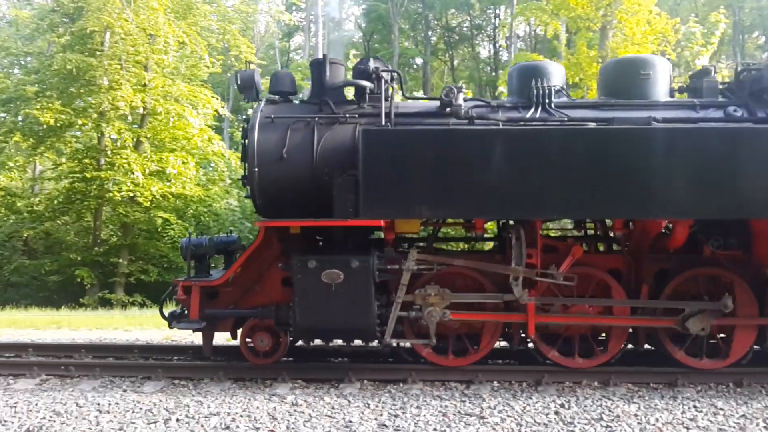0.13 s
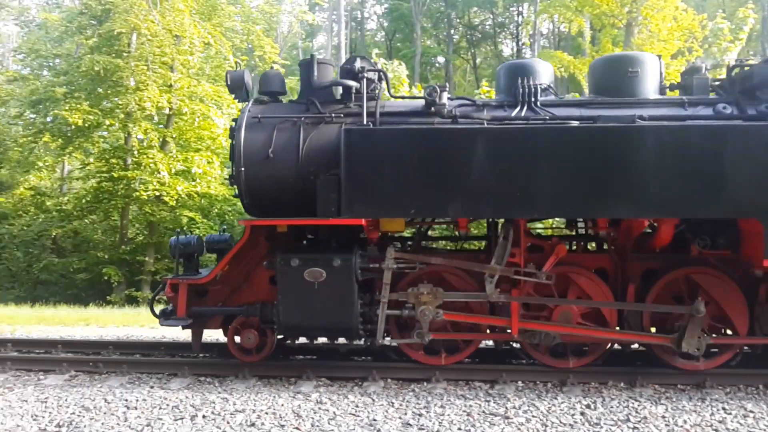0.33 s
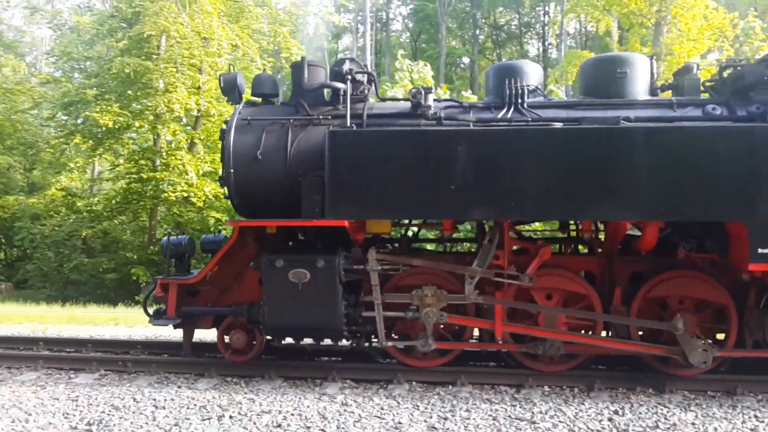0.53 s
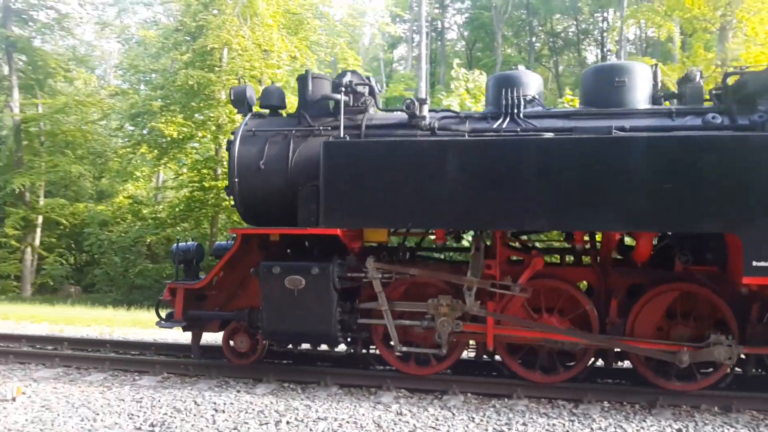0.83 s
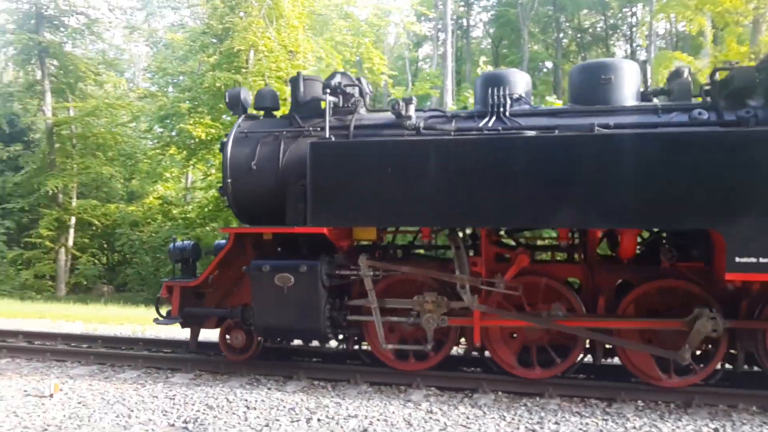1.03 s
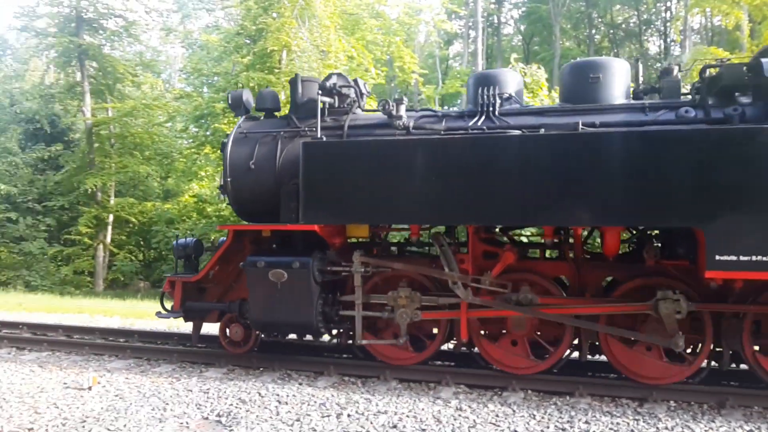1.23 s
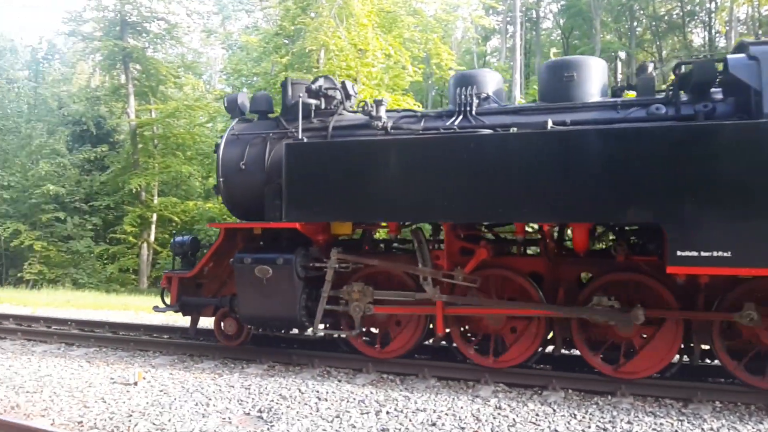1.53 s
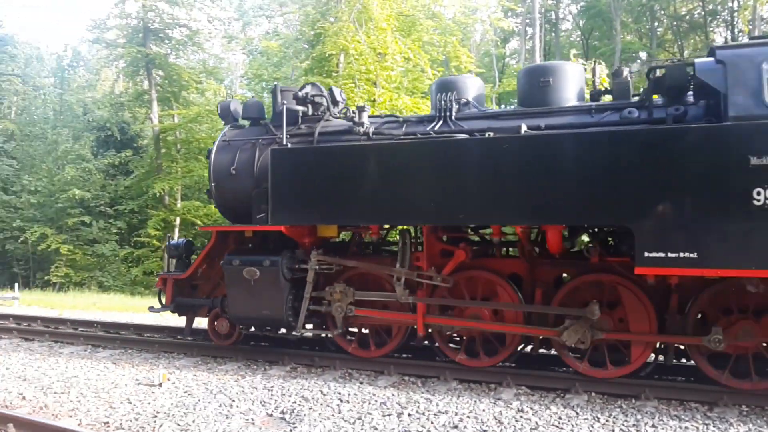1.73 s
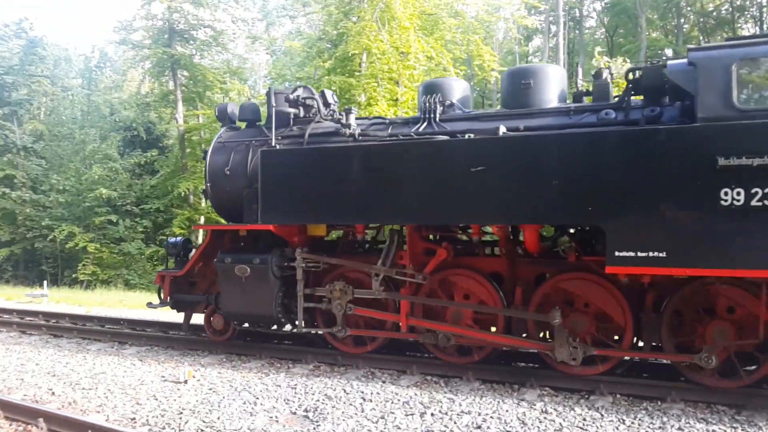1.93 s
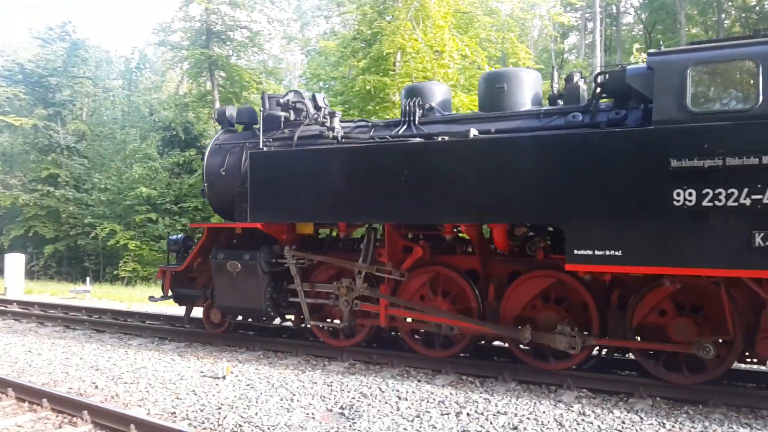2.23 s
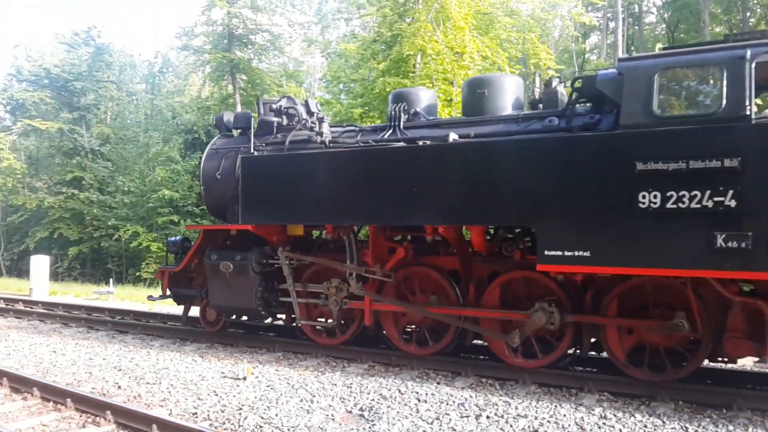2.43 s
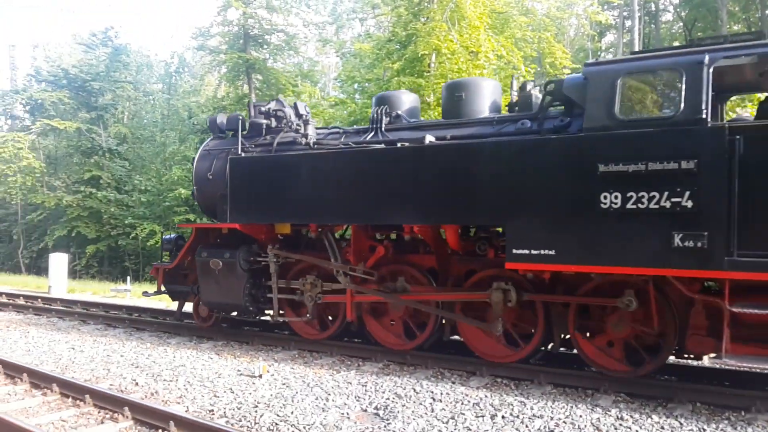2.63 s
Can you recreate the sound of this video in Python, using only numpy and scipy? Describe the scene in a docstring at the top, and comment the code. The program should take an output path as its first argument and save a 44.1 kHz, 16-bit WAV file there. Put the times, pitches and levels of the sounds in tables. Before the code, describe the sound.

A steam locomotive rolls slowly among trees, giving seven evenly spaced, hollow booming chuffs with hissing tails. Rods knock between beats, steam leaks steadily, wheels rumble low; the right microphone sounds muffled and slightly late.

```python
"""Exhaust beats of a steam locomotive rolling slowly among trees: each sends a jet of steam up the chimney,
which roars, barks and hisses as filtered noise, while the lowest pipe resonance booms as a wavering tone.
Rods knock now and then as struck steel modes, leaks hiss and whistle as coloured and narrow-band noise,
a short spit of steam escapes, and the wheels rumble as low noise.
Of the two microphone ports the right one is muffled and slightly late."""
import sys
import numpy as np
from scipy import signal
from scipy.fft import rfft, irfft, next_fast_len
from scipy.io import wavfile

SR = 44100
rng = np.random.default_rng(int(sys.argv[2]) if len(sys.argv) > 2 else 0)


def voltage_ratio(decibels):
    """Convert decibels (scalar or array-like) to amplitude ratios, 20 dB per decade."""
    exponent = np.asarray(decibels, float) / 20
    return 10 ** exponent


def int16_out(signal):
    """Quantize to a 16-bit WAV file."""
    q = np.round(np.clip(np.atleast_2d(signal).T, -1, 1) * 32767)
    wavfile.write(sys.argv[1], SR, q.astype(np.int16))


N = 123479   # samples
FFT = next_fast_len(N)


def rms_one(x):
    """Scale to unit rms."""
    return x / np.sqrt(np.mean(x ** 2) + 1e-20)


def at_hz(points):
    """Read a table of (Hz, value) at every FFT bin, on a log frequency axis."""
    hz, value = np.transpose(points)
    bins_hz = np.fft.rfftfreq(FFT, 1 / SR)
    return np.interp(np.log(bins_hz + 1), np.log(hz), value)


def level(rows):
    """Gain over time from rows of (s, dB)."""
    return voltage_ratio(np.interp(np.arange(N) / SR, *np.transpose(rows)))


def drift(rate_hz, count):
    """Slow random curves of unit rms: white noise through a double one-pole lowpass."""
    r = np.exp(-2 * np.pi * rate_hz / SR)
    white = rng.standard_normal((count, N + SR))
    slow = signal.lfilter([1], [1, -2 * r, r * r], white)
    return rms_one(slow[:, SR:])   # the first second lets the filter settle


def noise(spectrum, patchy_db, rate_hz):
    """Two unrelated noises of one colour; each octave band flickers on its own, alike in both."""
    coloured = rfft(rng.standard_normal((2, FFT))) * voltage_ratio(at_hz(spectrum))
    octave = np.log2(np.fft.rfftfreq(FFT, 1 / SR) / 40 + 1)
    out = 0
    for k, flicker in enumerate(drift(rate_hz, count=10)):
        band = np.clip(1 - abs(octave - k), 0, 1)
        out = out + voltage_ratio(patchy_db * flicker) * irfft(coloured * band, FFT)[:, :N]
    return rms_one(out)


def resonance(x, hz, width_hz):
    """Two-pole peak of gain 1."""
    r = np.exp(-np.pi * width_hz / SR)
    poles = [1, -2 * r * np.cos(2 * np.pi * hz / SR), r * r]
    return signal.lfilter([(1 - r * r) / 2, 0, (r * r - 1) / 2], poles, x + 1e-18)


def ringing(x, hz, width_hz):
    """The same resonance twice in a row, for steeper skirts, at unit rms."""
    return rms_one(resonance(resonance(x, hz, width_hz), hz, width_hz))


def burst(start_s, attack_s, hold_s, t60_s):
    """Envelope with smooth attack, hold and exponential release."""
    t = np.arange(N) / SR - start_s
    attack = np.sin(np.pi / 2 * np.clip(t / attack_s, 0, 1)) ** 2
    return attack * voltage_ratio(-60 * np.maximum(t - attack_s - hold_s, 0) / t60_s)


# The chimney's lowest note, one list per exhaust beat. Each row: time in seconds, level in dB, pitch in Hz.
BOOMS = [
    [(0.14, -69, 231.2), (0.165, -24, 224.6), (0.173, -52, 221), (0.183, -10, 228), (0.201, -23.5, 254.5),
     (0.211, -9, 250.7), (0.23, -7.5, 251.6), (0.242, -15.5, 261.5), (0.266, -19, 260),
     (0.286, -27.5, 257.7), (0.329, -31, 252.6), (0.347, -37, 268), (0.378, -30, 262), (0.405, -36, 250.4),
     (0.54, -59, 241)],
    [(0.56, -62, 240.8), (0.574, -45, 241), (0.585, -30, 233), (0.595, -18, 207), (0.612, -25.5, 261.6),
     (0.624, -7.5, 290.5), (0.647, -14.5, 237), (0.66, -33, 236), (0.676, -16, 232), (0.69, -23, 243),
     (0.704, -41, 242), (0.73, -31, 244), (0.753, -41, 276), (0.768, -36, 267), (0.8, -45, 264)],
    [(0.95, -62, 250.4), (0.971, -42, 255), (0.984, -23, 267.3), (1.001, -10, 251), (1.015, -21, 258),
     (1.023, -5.5, 243), (1.029, -22.5, 249), (1.036, -9.5, 257), (1.048, -18.5, 268), (1.075, -13.5, 256),
     (1.087, -31, 222), (1.109, -24, 251), (1.13, -47, 248.6), (1.143, -35.5, 258.5), (1.22, -42.5, 267)],
    [(1.33, -58, 224), (1.35, -34, 222.6), (1.364, -24.5, 210), (1.374, -28, 231), (1.384, -17, 245),
     (1.394, -7, 231), (1.397, -7.5, 223), (1.404, -26, 226), (1.411, -16, 217), (1.415, -8.5, 211),
     (1.419, -16.5, 220), (1.427, -38, 220), (1.443, -18, 209), (1.47, -38.5, 226), (1.52, -48, 224)],
    [(1.71, -60, 233.1), (1.737, -45, 232), (1.75, -21, 216), (1.759, -8, 244), (1.767, -19, 267),
     (1.784, -8, 228), (1.792, -29, 224), (1.799, -11.5, 234), (1.81, -44, 261), (1.818, -20.5, 253),
     (1.826, -21, 255), (1.833, -34, 243), (1.853, -29, 266), (1.861, -33, 287), (1.92, -60, 280)],
    [(2.08, -63, 251.8), (2.094, -56, 244), (2.106, -21, 257), (2.111, -19.5, 253), (2.132, -16.5, 263),
     (2.138, -14, 282), (2.143, -7.5, 262), (2.159, -25.5, 291.5), (2.168, -8.5, 252), (2.181, -29, 272),
     (2.201, -17, 261.7), (2.219, -33.5, 259), (2.239, -29.5, 254), (2.251, -41, 238), (2.28, -49, 225)],
    [(2.44, -62, 253), (2.466, -37, 266), (2.475, -19, 253), (2.488, -11.5, 248), (2.492, -8.5, 280),
     (2.498, -31, 276), (2.504, -20, 288), (2.511, -10, 281), (2.52, -14.5, 254), (2.53, -19, 274),
     (2.545, -13, 260.5), (2.577, -43.5, 260), (2.587, -33, 255), (2.612, -41, 243), (2.66, -56, 242)],
]


def boom():
    """Turbulence keeps the lowest pipe resonance ringing: a tone of wavering phase and fairly even level."""
    t = np.arange(N) / SR
    a, b = drift(rate_hz=12, count=2)
    waver = (a + 1j * b) / (np.hypot(a, b) + 0.021)
    waver = waver / np.sqrt(np.mean(abs(waver) ** 2))
    out = 0
    for rows in BOOMS:
        s, db, hz = np.transpose(rows)
        phase = 2 * np.pi * np.cumsum(np.interp(t, s, hz)) / SR
        gain = voltage_ratio(np.interp(t, s, db, -120, -120))
        out = out + gain * np.sqrt(2) * np.real(waver * np.exp(1j * phase))
    return out


# Steam jet of each beat. Each row: start in seconds, hold in seconds, roar level in dB, hiss level in dB.
BEATS = [(0.154, 0.038, -27.5, -35.5), (.575, 0.037, -27, -31), (0.964, 0.04, -29.5, -33),
         (1.336, 0.034, -35, -35.5), (1.712, 0.029, -29.5, -33.5), (2.097, 0.026, -29, -33),
         (2.456, 0.023, -33.5, -33.5)]
# Colour of the roar. Each row: frequency in Hz, relative level in dB per Hz.
ROAR_COLOUR = [(40, -100), (70, -27), (130, 5.5), (200, -14.5), (330, -4), (420, -4), (800, -14),
               (1300, -25.5), (2400, -19), (3500, -70), (5000, -66)]


def roar():
    """Turbulent steam roars at each beat, with a slow tail sent back by the trees."""
    attack_s, t60_s = 0.026, 0.5
    echo_db, echo_t60_s = -10, 1.1
    start_s, hold_s, roar_db, _ = np.transpose(BEATS)[:, :, None]
    direct = burst(start_s, attack_s, hold_s, t60_s)
    echo = voltage_ratio(echo_db) * burst(start_s, attack_s, hold_s, echo_t60_s)
    envelope = (voltage_ratio(roar_db) * (direct + echo)).sum(0)
    return envelope * noise(ROAR_COLOUR, patchy_db=6.5, rate_hz=21)


# Upper chimney resonances. Each row: pitch in Hz, width of one filter pass in Hz, family from 0 to 4.
PIPE = [(520, 80, 0), (660, 80, 1), (930, 100, 2), (1080, 80, 2), (1420, 80, 3), (1620, 80, 3),
        (2080, 45, 4)]
# How hard each beat barks. Each row is a beat: levels of families 0, 1, 2, 3 and 4, each in dB.
BARKS = [(-34.5, -35, -36.5, -47, -44.5), (-33, -27.5, -31.5, -41, -50), (-34, -29.5, -35, -40, -48),
         (-35, -32, -35.5, -43, -52), (-30.5, -32, -36, -42, -52), (-25, -36, -36, -46.5, -59),
         (-24, -28, -37, -42, -51)]


def bark():
    """The lumpy jet excites the chimney's upper resonances, one strength per beat and family."""
    attack_s, t60_s = 0.04, 0.14
    flutter_db, flutter_hz = 1.5, 40
    start_s, hold_s, _, _ = np.transpose(BEATS)[:, :, None]
    flutter = rms_one(voltage_ratio(flutter_db * drift(flutter_hz, count=1)))
    pulses = burst(start_s, attack_s, hold_s, t60_s) * flutter
    white = rng.standard_normal((2, N))
    out = 0
    for hz, width_hz, family in PIPE:
        envelope = voltage_ratio(np.array(BARKS)[:, family]) @ pulses
        out = out + ringing(white, hz, width_hz) * envelope
    return out


# Colour of the jet's hiss. Each row: frequency in Hz, relative level in dB per Hz.
JET_HISS_COLOUR = [(1470, -21), (2500, -12.5), (3120, -14), (4780, -9), (5780, -8), (7000, -3), (7820, -10),
                   (10000, -17.5), (11500, -17), (14500, -57)]


def jet_hiss():
    """Steam hisses at the chimney mouth on each beat, with a slower attack than the roar."""
    attack_s, t60_s = 0.034, 0.57
    hold_share = 0.88   # of the hold in the beat table
    start_s, hold_s, _, hiss_db = np.transpose(BEATS)[:, :, None]
    envelope = (voltage_ratio(hiss_db) * burst(start_s, attack_s, hold_share * hold_s, t60_s)).sum(0)
    return envelope * noise(JET_HISS_COLOUR, patchy_db=2.0, rate_hz=9)


# Knocks of the rods. Each row: start in seconds, nominal peak in dB, brightness in dB per octave about 700 Hz,
# crack level in dB over the peak.
KNOCKS = [(.392, -23, 2, -14), (.720, -35, 4, 2), (1.254, -36, 1, -14), (1.559, -40, 0, -14),
          (1.950, -18, -1, -20), (2.299, -32, -5, -20)]
# Steel modes of the rods. Each row: pitch in Hz, nominal level in dB over the peak, t60 in seconds.
ROD_MODES = [(480, -11, .04), (580, -4, .06), (680, -10, .04), (880, -6, .05), (1260, -10, .045),
             (1700, -22, .025)]


def rods():
    """Slack in the rods: a crack of noise, then a knock and a rebound into short steel modes."""
    rebound_s, rebound_db = 0.019, -10
    crack_hz, crack_width_hz, crack_t60_s = 1400, 900, 0.025
    contact_hz = 1620   # lowpass that softens the contact
    start_s, peak_db, tilt, crack_db = np.transpose(KNOCKS)
    crack_envelope = voltage_ratio(peak_db + crack_db) @ burst(start_s[:, None], 0.001, 0.00067, crack_t60_s)
    out = crack_envelope * ringing(rng.standard_normal(N), crack_hz, crack_width_hz)
    soft = signal.butter(2, contact_hz, fs=SR, output="sos")
    knock_at = (start_s * SR).astype(int)
    rebound_at = ((start_s + rebound_s) * SR).astype(int)
    spread_db = rng.normal(0, 1.5, (len(KNOCKS), 2 * len(ROD_MODES)))   # no two blows alike
    for k, (hz, db, t60_s) in enumerate(ROD_MODES):
        mode_db = peak_db + db + tilt * np.log2(hz / 700)
        clicks = np.zeros(N)
        clicks[knock_at] = voltage_ratio(mode_db + spread_db[:, 2 * k])
        clicks[rebound_at] = voltage_ratio(mode_db + rebound_db + spread_db[:, 2 * k + 1])
        blows = signal.sosfilt(soft, clicks + 1e-18)
        r, w = voltage_ratio(-60 / (t60_s * SR)), 2 * np.pi * hz / SR
        out = out + signal.lfilter([0, np.sin(w)], [1, -2 * r * np.cos(w), r * r], blows)
    return out


# Colour of the spit of steam. Each row: frequency in Hz, relative level in dB per Hz.
SPIT_COLOUR = [(290, -9), (500, -5), (997, -5), (1590, -8), (2290, -15), (2640, -18), (5330, -12),
               (7270, -4.5), (9770, -25), (12400, -26), (14500, -39)]


def spit():
    """One short spit of steam: coloured noise plus a ringing band."""
    puff = voltage_ratio(-33) * noise(SPIT_COLOUR, patchy_db=0.5, rate_hz=40)
    ring = voltage_ratio(-41) * ringing(rng.standard_normal((2, N)), hz=2290, width_hz=90)
    return (puff + ring) * burst(start_s=2.731, attack_s=0.004, hold_s=0.0099, t60_s=0.099)


# Colour of the leaking steam. Each row: frequency in Hz, relative level in dB per Hz.
LEAK_COLOUR = [(1060, -24), (1800, -4), (1910, -8), (3090, -20.5), (3370, -12.5), (3850, -6.5),
               (4350, -7.5), (4700, -1.5), (5600, -5), (6610, 2.5), (10100, -7.5), (11900, -7),
               (14500, -19)]
# Loudness of the leaks' hiss. Each row: time in seconds, level in dB.
LEAK_LEVEL = [(0.0, -41), (2.12, -41), (2.8, -43.5)]


def leak_hiss():
    """Steam escaping through leaks: a nearly steady hiss."""
    return level(LEAK_LEVEL) * noise(LEAK_COLOUR, patchy_db=1.2, rate_hz=10.2)


# Whistles of the leaks. Each row: centre pitch in Hz, approximate width in Hz, middle level in dB.
WHISTLES = [(4810, 50, -53), (4650, 50, -57), (6600, 50, -53), (6410, 50, -55), (7080, 120, -57)]


def leak_whistles():
    """Faint breathy whistles: narrow-band noise on carriers that wander in pitch and level."""
    wander_share = 0.007   # of the pitch
    wavers = drift(12, count=len(WHISTLES))
    wanders = drift(3, count=len(WHISTLES))
    out = 0
    for (hz, width_hz, db), waver, wander in zip(WHISTLES, wavers, wanders):
        a, b = drift(width_hz / 2, count=4).reshape(2, 2, N)
        phase = 2 * np.pi * np.cumsum(hz * (1 + wander_share * wander)) / SR
        out = out + voltage_ratio(db + 2.5 * waver) * (a * np.cos(phase) + b * np.sin(phase))
    return out


# Colour of the wheels. Each row: frequency in Hz, relative level in dB per Hz.
RUMBLE_COLOUR = [(12, -46), (20, -10), (166, 1.5), (299, 3), (361, -10.5), (573, -4.5), (663, -7),
                 (967, -11.5), (1320, -15), (1570, -16.5), (1700, -29), (1890, -18), (3000, -22.5),
                 (3900, -31), (6600, -120)]
# Loudness of the wheels. Each row: time in seconds, level in dB.
RUMBLE_LEVEL = [(0.0, -38.5), (0.37, -37.5), (0.73, -41.5), (0.95, -38), (1.21, -38), (1.71, -38),
                (1.98, -36.5), (2.8, -36.5)]


def rumble():
    """Rolling wheels: low, mildly flickering noise that swells and sags."""
    return level(RUMBLE_LEVEL) * noise(RUMBLE_COLOUR, patchy_db=1.5, rate_hz=12)


def scene():
    """Row 0 reaches both ports, row 1 is what the right port hears by other paths."""
    jet = roar() + bark() + jet_hiss()
    leaks = leak_hiss() + leak_whistles() + spit()
    return boom() + jet + rods() + leaks + rumble()   # boom and rods are the same in both rows


# Overall response. Each row: frequency in Hz, gain in dB.
PASSBAND = [(15, -30), (30, -10), (55, 0), (14550, 0), (14650, -90)]
# Balance of the ports. Each row: frequency in Hz, left minus right in dB.
PORT_BALANCE = [(60, -4.5), (200, -3.5), (400, -2), (730, 0), (1200, 5), (2000, 8), (3200, 10.5),
                (4200, 11.5), (4800, 17), (5400, 24), (6600, 65.5), (8000, 46), (10500, 44.5), (14500, 34)]
# Likeness of the ports. Each row: frequency in Hz, share in common from 0 to 1.
PORT_LIKENESS = [(40, .93), (150, .99), (320, .995), (420, .93), (650, .94), (1000, .85), (1300, .6),
                 (2000, .6), (3000, .2), (5000, .3), (8000, .1)]
# Lateness of the right port. Each row: frequency in Hz, lead of the left port in radians.
PORT_LEAD = [(40, .06), (130, .26), (250, .5), (500, .8), (1000, 1.2), (2000, 2.1), (4000, 3.0),
             (8000, 3.6)]


def two_ports(dry):
    """The right port hears a muffled, late, partly unlike version of what the left one hears."""
    shared, other = rfft(dry, FFT) * voltage_ratio(at_hz(PASSBAND))
    alike = np.clip(at_hz(PORT_LIKENESS), 0, 1)
    ratio, lead = voltage_ratio(-at_hz(PORT_BALANCE)), at_hz(PORT_LEAD)
    right = alike * shared + np.sqrt(1 - alike ** 2) * other * -1j
    late_right = ratio * right * np.exp(-1j * lead)
    # holds the mean of the ports at the scene's level where the two rows are unrelated
    port_gain = 2 / np.sqrt(1 + ratio ** 2 + 2 * ratio * alike * np.cos(lead))
    return irfft(port_gain * np.array([shared, late_right]), FFT)[:, :N]


def band_limit(x):
    """A steep low-pass at the top of the band."""
    return signal.sosfilt(signal.butter(12, 14600, fs=SR, output="sos"), x)


def record(dry):
    """Picks the scene up at two ports and rounds the peaks softly."""
    top = 1.1   # height the peaks are rounded towards
    mix = top * np.tanh(two_ports(dry) / top)
    return band_limit(mix)


dry = scene()
out = record(dry)
int16_out(out)
```